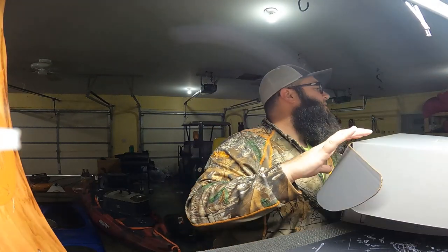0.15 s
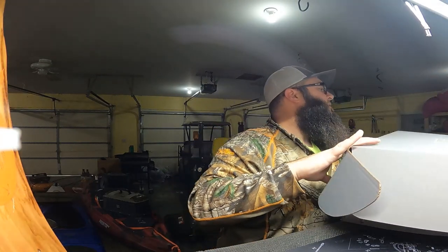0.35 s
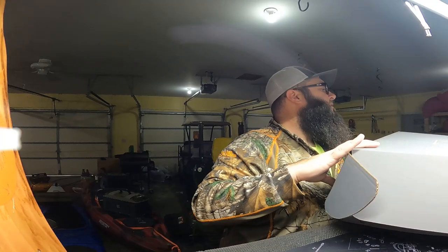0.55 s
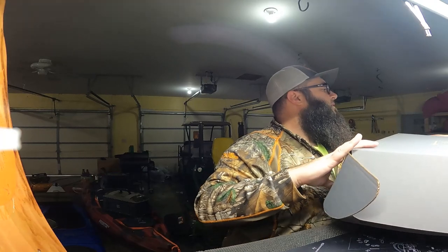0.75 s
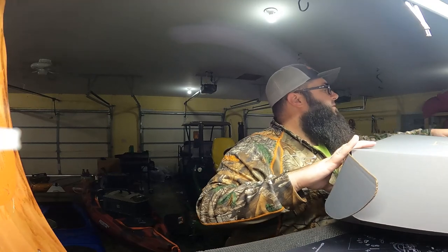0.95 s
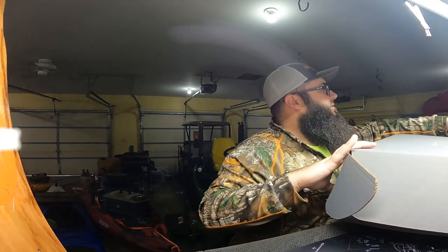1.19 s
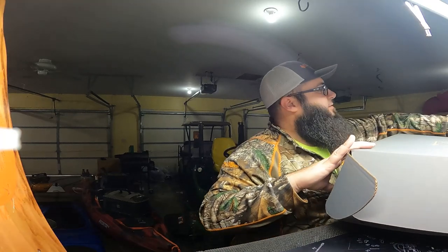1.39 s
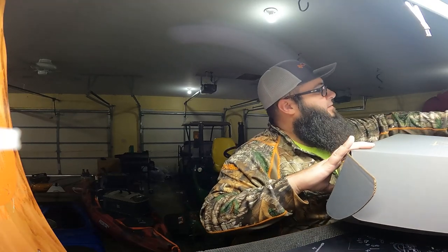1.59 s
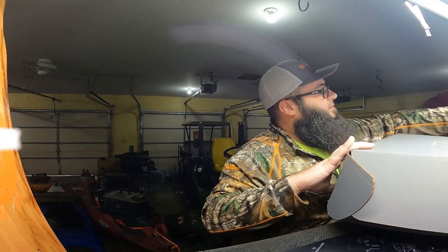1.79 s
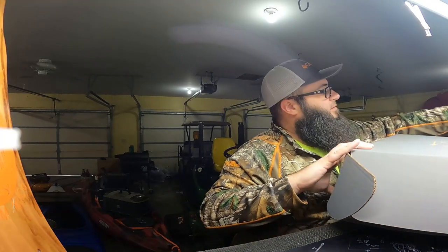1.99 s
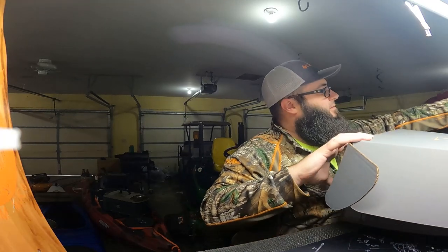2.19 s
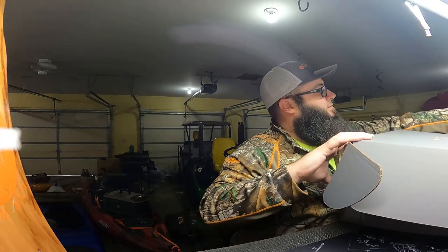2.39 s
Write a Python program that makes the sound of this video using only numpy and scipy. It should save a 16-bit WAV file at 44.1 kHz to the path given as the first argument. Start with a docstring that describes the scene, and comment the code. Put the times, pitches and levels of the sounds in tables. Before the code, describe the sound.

A cardboard box flap knocks and scrapes as it is folded shut in a garage.

```python
"""A cardboard lid flap is folded shut on its box, close up in a garage.
Room hush and the rumble of the handled box run throughout; a faint echo follows each contact.
At 0.2 s the flap knocks, ringing the hollow body and stiff panel. At 0.6 s it scrapes along the
edge, slips rasping in the panel and hissing in the fibres; at 0.9 s it knocks again. Near 1.6 s
the edge catches in a run of small snaps. More strokes lead to the hardest knock at 2.1 s."""
import sys
import numpy as np
from scipy import signal
from scipy.fft import rfft, irfft, next_fast_len
from scipy.io import wavfile
from scipy.ndimage import map_coordinates

SR = 44100
rng = np.random.default_rng(int(sys.argv[2]) if len(sys.argv) > 2 else 0)


def master_out(mix):
    """Clip the mix to full scale and print it as 16-bit PCM to the path in sys.argv[1]."""
    frames = np.transpose(np.atleast_2d(mix))
    ceiling = np.clip(frames, -1, 1)
    pcm = np.round(ceiling * 32767).astype(np.int16)
    wavfile.write(sys.argv[1], SR, pcm)


N = 108045

# stereo width: f/Hz, side over mid/dB
SIDE_SPECTRUM = [(120, -23.5), (450, -17), (1200, -4), (14000, -5.5)]
# room air: f/Hz, level/dB
HUSH_SPECTRUM = [(200, 1), (1400, -3.5), (2800, -14.5), (5000, -15), (8500, -26), (12000, -30.5),
                 (15800, -38)]
# garage decay: f/Hz, t60/s
GARAGE_DECAY = [(100, 0.36), (3000, 0.55), (12000, 0.082)]
# rumble of the held box: t/s, level/dB
RUMBLE_LEVELS = [(0, -44.5), (.5, -47), (1.1, -43.5), (2.198, -45), (2.45, -52.5)]
# rumble colour: f/Hz, level/dB
RUMBLE_SPECTRUM = [(20, -6), (45, -2.5), (72, 1.5), (100, -1.5), (165, 3), (300, -6), (640, -25),
                   (2000, -81)]
# edge catches: t/s, level/dB, t60/s
EDGE_SNAPS = [(0.2009, -25.5, 0.026), (0.4672, -44, 0.05), (0.779, -49.5, 0.028), (.9445, -34, 0.027),
              (0.9745, -38, 0.11), (1.28, -38.5, 0.022), (1.453, -46.5, 0.053), (1.5291, -43, 0.022),
              (1.5666, -33, 0.036), (1.5808, -32, 0.034), (1.587, -29.5, 0.034), (1.6022, -28, 0.034),
              (1.6115, -33, 0.026), (1.6186, -26.5, 0.04), (1.838, -44.5, 0.032), (1.9162, -34.5, 0.041)]
# snap colour: f/Hz, level/dB
SNAP_SPECTRUM = [(150, -10.5), (600, 10), (1200, 9.5), (2100, 3), (4500, 1), (8500, -11.5), (11500, -8.5),
                 (15800, -27)]
# sliding strokes: t/s, swell/s, fall t60/s, rasp/dB, fibre hiss/dB, sheen/dB
SLIDE_STROKES = [(0, 0.0009, 0.13, -33, -31, -55), (0.081, 0.092, 0.093, -46.5, -46, -56.5),
                 (0.237, 0.017, 0.27, -47.5, -54.5, -71), (0.567, 0.051, 0.2, -23, -32, -42.5),
                 (0.773, 0.0026, 0.41, -46, -51.5, -64.5), (0.841, 0.084, 0.066, -42, -41, -56),
                 (0.9383, 0.0023, 0.061, -24, -29.5, -47), (1.17, 0.061, 0.72, -47.5, -53, -65),
                 (1.568, 0.052, .14, -36, -46, -59), (1.751, 0.033, 0.061, -38.5, -45.5, -58.5),
                 (1.939, 0.085, 0.27, -44, -48.5, -67), (2.028, 0.032, 0.35, -28, -35.5, -47.5),
                 (2.069, 0.05, 0.045, -28, -35, -67), (2.141, 0.023, 0.32, -29.5, -37, -50.5),
                 (2.243, 0.027, 0.052, -82, -44.5, -71)]
# rubbed panel resonances: f/Hz, bandwidth/Hz, level/dB
RASP_MODES = [(205, 24, 0.5), (311, 53, 2), (488.7, 19, 9), (602.5, 63, 9), (667, 52, 4.5), (986, 34.6, 10),
              (1234, 35, 6.5), (1834, 38, -4), (2550, 81, 0)]
# fibre hiss: f/Hz, level/dB
FIBRE_SPECTRUM = [(600, -15.5), (1500, 4), (2500, -2), (4800, -3), (6300, -9.5), (7800, -23.5), (9500, -43),
                  (15800, -83)]
# top sheen of the rubbing: f/Hz, level/dB
SHEEN_SPECTRUM = [(4500, -29), (7800, 3.5), (9000, -1.5), (11200, 3.5), (13000, -4), (15800, -12.5)]
# hollow body modes: f/Hz, relative level/dB, t60/s
BODY_MODES = [(70, 3.5, 0.49), (148.5, 0, 0.19), (186.7, -2.5, 0.1), (219.7, -1.5, 0.15),
              (292.6, 0.5, 0.13), (334.3, 3, 0.14), (413.4, -6, 0.1), (512, 2, 0.015)]
# stiff panel modes: f/Hz, relative level/dB, t60/s
PANEL_MODES = [(554, -2, 0.074), (628, 9, 0.051), (947, -6, 0.051), (1192, -4, 0.036)]
# flap blows: t/s, body/dB, favoured body f/Hz, panel/dB, t60 factor
FLAP_KNOCKS = [(0.164, -72, 300, -25, 1), (0.2001, -7.5, 183, -3, 0.95), (.244, -14, 157, -15.5, 0.49),
               (0.272, -12, 159, -16, 0.2), (.292, -21.5, 205, -26, 0.53),
               (0.9164, -11.5, 218, -15.5, 0.69), (.936, -21.5, 191, -21, 0.9),
               (1.031, -34.5, 60.9, -69, 0.7), (1.056, -32.5, 330, -41, 1), (1.371, -21.5, 208, -64, 0.49),
               (1.447, -29.5, 374, -51, 1), (1.774, -21, 308, -20.5, 0.75), (1.838, -35, 303, -21, 0.32),
               (1.893, -33.5, 77, -37, 1), (2.056, -17, 374, -57, 1), (2.082, -8, 300, -9, 0.78),
               (2.104, -3, 243, -8, 0.49), (2.247, -23, 213, -55, 1)]

HUSH_DB, GARAGE_DB, RUMBLE_SWING_DB = -54, -17.5, 1.2
SLIPS_PER_S, SLIP_SPREAD_DB, SMOOTH_SHARE = 3000, 5, 0.66
JUDDER_DB, JUDDER_PER_S = 1.1, 170
BITE_S, SWELL_DB, RASP_TOP_HZ = 0.004, 10.5, 2220
FLAP_T60_S, FLAP_DB = 0.014, -0.5  # flap ring, re direct hiss
SNAP_ATTACK_S, BODY_ATTACK_S, PANEL_ATTACK_S = 0.00017, 0.00033, 0.0028
FAVOUR_OCTAVES, MODE_SCATTER_DB = 0.9, 3
ROLL_OFF_HZ, TOP_HZ = 14200, 15900


def amp(db):
    """Decibels to gain."""
    return 10 ** (np.asarray(db) / 20)


def unit(x):
    """Scale to rms 1."""
    return x / np.sqrt(np.mean(x ** 2) + 1e-20)


def decay(t, t60_s):
    """Exponential fall, 60 dB per t60_s."""
    return np.exp(-np.log(1000) * t / t60_s)


def along(points, hz):
    """Interpolate (f/Hz, value) points on a log axis."""
    f, values = np.transpose(points)
    return np.interp(np.log(hz + 1), np.log(f + 1), values)


def wobble(knots_per_s):
    """Smooth random curve."""
    knots = rng.standard_normal(int(N * knots_per_s / SR) + 4)
    return map_coordinates(knots, [np.arange(N) * knots_per_s / SR])


def filtered(x, response):
    """Apply the gain response(hz) by FFT."""
    size = next_fast_len(N + SR // 2)
    return irfft(rfft(x, size) * response(np.fft.rfftfreq(size, 1 / SR)), size)[..., :N]


def coloured(x, spectrum):
    """Shape x by (f/Hz, level/dB) points; rms 1."""
    return unit(filtered(x, lambda hz: amp(along(spectrum, hz))))


def spread(pair):
    """Mid/side to left/right: near-mono bass, wider treble."""
    side = filtered(pair[1], lambda hz: amp(along(SIDE_SPECTRUM, hz)))
    return np.array([pair[0] + side, pair[0] - side])


def add(track, start_s, sound):
    """Mix sound into track in place."""
    part = track[..., round(start_s * SR):][..., :sound.shape[-1]]
    part += sound[..., :part.shape[-1]]


def room_hush():
    """Steady air of the room."""
    return spread(amp(HUSH_DB) * coloured(rng.standard_normal((2, N)), HUSH_SPECTRUM))


def garage_echo(x):
    """Diffuse echo; the top treble dies first."""
    hz, t, bins = signal.stft(rng.standard_normal((2, SR // 2)), SR, nperseg=256)
    t60_s = along(GARAGE_DECAY, hz)[:, None]
    tail = signal.istft(bins * decay(t, t60_s), SR, nperseg=256)[1]
    tail /= np.linalg.norm(tail[0])
    return spread(signal.fftconvolve(x.mean(0)[None], tail, axes=1)[:, :N])


def box_rumble():
    """The box rumbles unevenly under the hands."""
    times_s, db = np.transpose(RUMBLE_LEVELS)
    level = amp(np.interp(np.arange(N) / SR, times_s, db) + RUMBLE_SWING_DB * wobble(knots_per_s=11.34))
    return spread(level * coloured(rng.standard_normal((2, N)), RUMBLE_SPECTRUM))


def edge_snaps():
    """The edge catches and lets go with short dry cracks."""
    level, t = np.zeros(N), np.arange(SR // 8) / SR
    for start_s, db, t60_s in EDGE_SNAPS:
        add(level, start_s, amp(db) * decay(t, t60_s) * (1 - np.exp(-t / SNAP_ATTACK_S)))
    return spread(level * coloured(rng.standard_normal((2, N)), SNAP_SPECTRUM))


def friction():
    """Dense tiny slips of uneven size over smooth rubbing noise."""
    slips = (rng.random(N) < SLIPS_PER_S / SR) * amp(SLIP_SPREAD_DB * rng.standard_normal(N))
    grain = unit(slips * rng.choice([-1, 1], (2, N)))
    return np.sqrt(1 - SMOOTH_SHARE) * grain + np.sqrt(SMOOTH_SHARE) * rng.standard_normal((2, N))


def panel_response(hz):
    """Resonances of the rubbed panel; it passes little treble."""
    peaks = sum(amp(db) * 1j * hz * width_hz / (mode_hz ** 2 - hz ** 2 + 1j * hz * width_hz)
                for mode_hz, width_hz, db in RASP_MODES)
    return peaks / (1 + (hz / RASP_TOP_HZ) ** 4)


def flap_ring(hiss):
    """Hiss plus the dense short ring of one spot on the flap."""
    t = np.arange(SR // 20) / SR
    impulse = rng.standard_normal((2, len(t))) * decay(t, FLAP_T60_S)
    impulse /= np.linalg.norm(impulse, axis=1, keepdims=True)
    ringing = signal.oaconvolve(hiss, impulse, axes=1)[:, :N]
    return (hiss + amp(FLAP_DB) * ringing) / np.hypot(1, amp(FLAP_DB))


def edge_scrapes():
    """The sliding edge judders: panel rasp and fibre hiss, on a new spot each stroke."""
    t, out = np.arange(SR) / SR, np.zeros((2, N))
    slips = unit(friction() * amp(JUDDER_DB * wobble(JUDDER_PER_S)))
    rasp = unit(filtered(slips, panel_response))
    fibres = coloured(slips, FIBRE_SPECTRUM)
    sheen = coloured(slips, SHEEN_SPECTRUM)
    for start_s, swell_s, t60_s, rasp_db, fibre_db, sheen_db in SLIDE_STROKES:
        bite = 1 - np.exp(-t / BITE_S)
        swell = amp(SWELL_DB * np.minimum(t / max(swell_s, 0.001) - 1, 0))
        fall = decay(np.maximum(t - swell_s, 0), t60_s)
        level = np.zeros(N)
        add(level, start_s, bite * swell * fall)
        hiss = amp(fibre_db) * fibres + amp(sheen_db) * sheen
        out += level * (amp(rasp_db) * rasp + flap_ring(hiss))
    return spread(out)


def struck_modes(modes, t60_factor, attack_s, favoured_hz=None):
    """Damped modes after one blow, as mid/side; the hand shortens the ring."""
    t = np.arange(SR // 2) / SR
    hz, db, t60_s = np.transpose(modes)
    gain = (-1) ** np.arange(len(hz)) * amp(db + MODE_SCATTER_DB * rng.standard_normal(len(hz)))
    if favoured_hz:
        gain /= (1 + (np.log2(hz / favoured_hz) / FAVOUR_OCTAVES) ** 2) ** 2
    gain /= np.linalg.norm(gain)
    fade = gain[:, None] * decay(t, t60_s[:, None] * t60_factor)
    wave = (fade * np.exp(2j * np.pi * hz[:, None] * t)).sum(0)
    wave *= 1 - np.exp(-t / attack_s)
    return np.array([wave.imag, wave.real])


def flap_knocks():
    """Each blow rings the hollow body and the stiff panel."""
    out = np.zeros((2, N))
    for start_s, body_db, favoured_hz, panel_db, t60_factor in FLAP_KNOCKS:
        add(out, start_s, amp(body_db) * struck_modes(BODY_MODES, t60_factor, BODY_ATTACK_S, favoured_hz))
        add(out, start_s, amp(panel_db) * struck_modes(PANEL_MODES, t60_factor, PANEL_ATTACK_S))
    return spread(out)


def scene():
    """Flap contacts and their echo over rumble and hush."""
    contacts = flap_knocks() + edge_scrapes() + edge_snaps()
    return contacts + amp(GARAGE_DB) * garage_echo(contacts) + box_rumble() + room_hush()


def record(dry):
    """Recorder: treble roll-off and hard band limit."""
    return filtered(dry, lambda hz: (hz < TOP_HZ) / np.sqrt(1 + (hz / ROLL_OFF_HZ) ** 20))


dry = scene()
out = record(dry)
master_out(out)
```